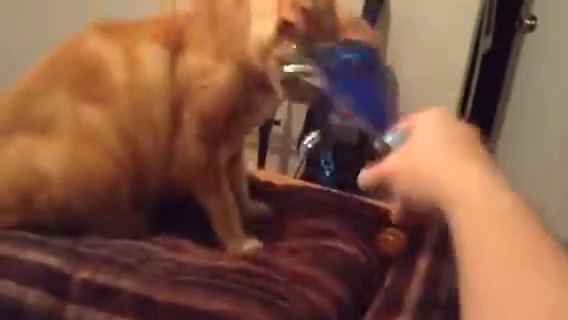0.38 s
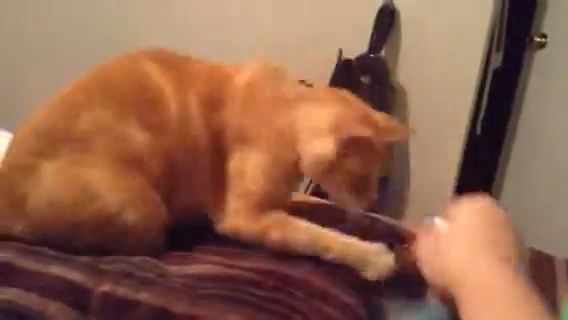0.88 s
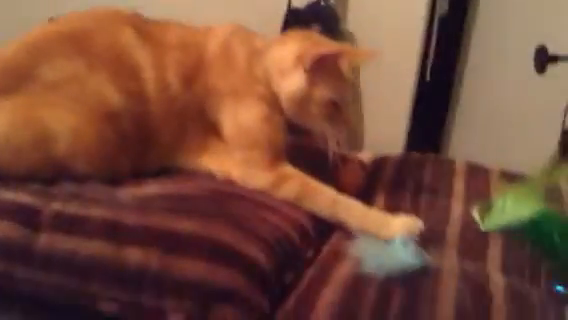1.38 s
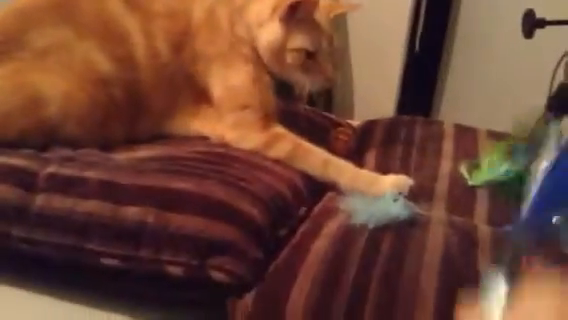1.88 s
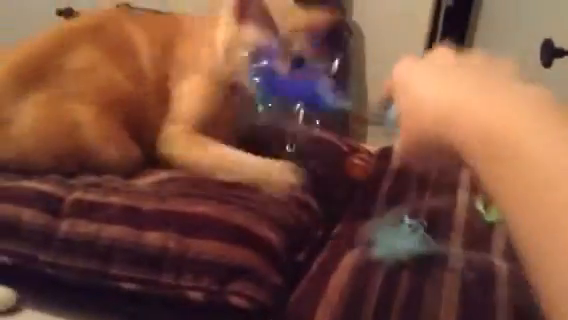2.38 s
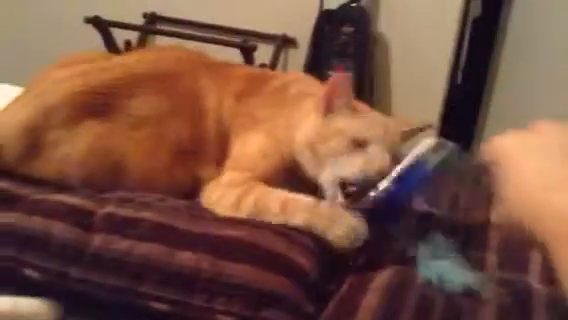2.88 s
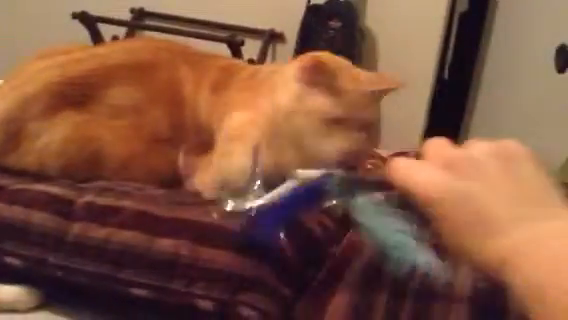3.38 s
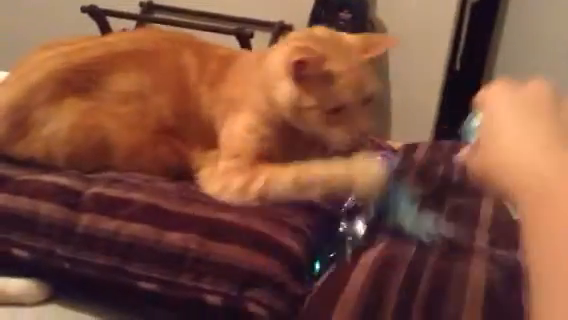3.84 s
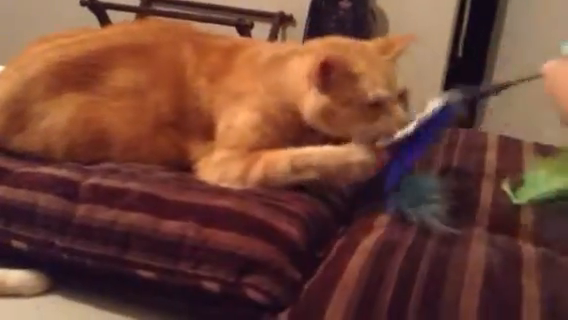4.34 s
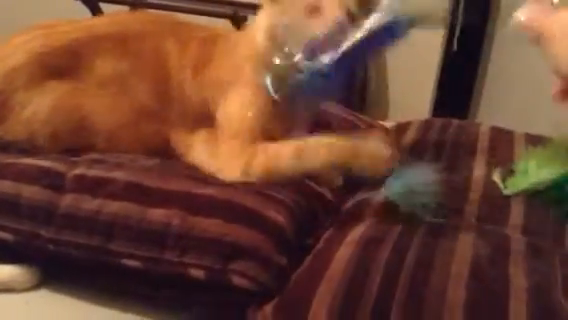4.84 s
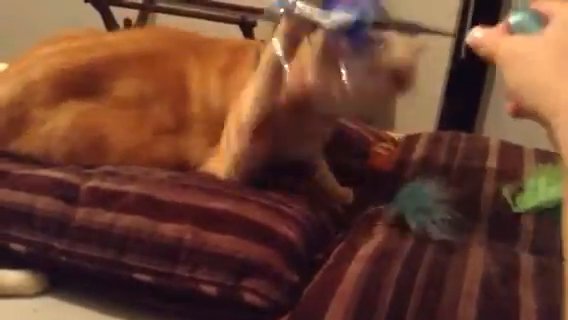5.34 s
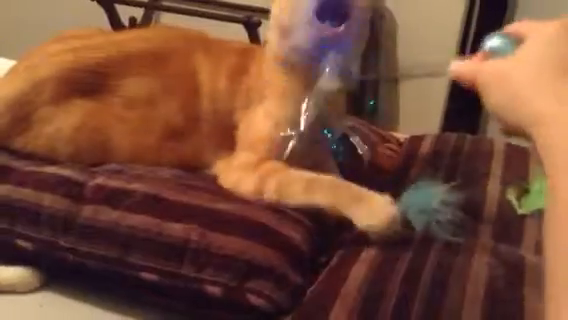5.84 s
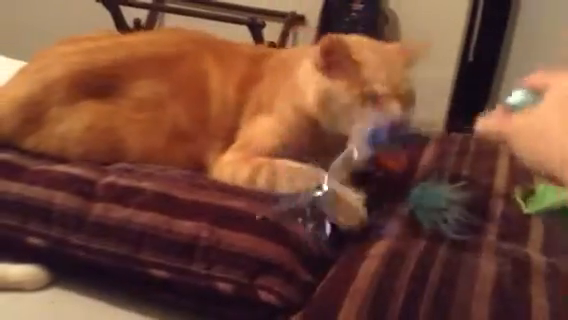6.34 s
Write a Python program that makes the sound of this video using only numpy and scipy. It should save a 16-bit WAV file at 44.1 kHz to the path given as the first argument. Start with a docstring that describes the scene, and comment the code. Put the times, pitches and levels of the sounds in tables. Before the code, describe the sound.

Close to a phone in a small bedroom, thin foil streamers swish and crackle in irregular bursts. Early on, two hard wand knocks land with dry scratching on cloth between and after them; later come a bright snap, another loud knock, then busy crinkling and small ticks. A low fan hum with soft hiss runs steadily underneath.

```python
"""Foil streamers and feathers on a wand toy rustle and snap as a cat on a bed bats them, close to a phone.
Dense noise grains make the rustle and short filtered bursts the snaps; damped resonances make the wand's
knocks and scrapes, and sparse clicks the ticking of a loose part. Paws thump softly on the mattress.
A fan motor hums behind the wall as wavering sines and resonant noise, over the hiss of the microphone.
A small bedroom answers the hits, scrapes and ticks with decaying noise."""
import sys
import numpy as np
from scipy import signal
from scipy.fft import rfft, irfft
from scipy.io import wavfile
from scipy.ndimage import uniform_filter1d

SR = 44100
rng = np.random.default_rng(int(sys.argv[2]) if len(sys.argv) > 2 else 0)


def log_audio(samples):
    """Write samples as a 16-bit WAV file to the path given in sys.argv[1]."""
    # one column per channel
    frames = np.atleast_2d(samples).T
    # limit to full scale, then quantise
    limited = np.clip(frames, -1, 1)
    pcm = np.round(limited * 32767).astype(np.int16)
    wavfile.write(sys.argv[1], SR, pcm)


def ratio_of_db(decibels):
    """Turn decibels (scalar or array-like) into linear amplitude factors; 0 dB maps to 1."""
    return 10 ** (np.asarray(decibels, float) / 20)


N = 285768
T = np.arange(N) / SR

# swings of the streamers: peak_s, level_db, rise_s, fall_s, lower_treble_db (relative to level_db)
STREAMER_SWINGS = [(0.1, -60, 0.38, 0.16, -11), (0.24, -54.5, 0.33, .1, -11), (0.44, -53, 0.27, 0.22, -9.5),
                   (0.6, -51, 0.033, .12, -11), (0.657, -41, 0.025, 0.071, -8), (0.78, -47.5, 0.1, .12, -5),
                   (0.86, -49.5, 0.14, 0.062, -12), (0.965, -51.5, .03, 0.3, -7), (1.12, -58, .1, 0.096, 0),
                   (1.338, -52.5, .06, 0.15, -11), (1.75, -52, 0.15, .2, 2.5),
                   (1.89, -52.5, 0.087, 0.22, -1), (2.19, -46.5, 0.12, .1, -8),
                   (2.28, -47.5, .08, 0.12, -12), (2.37, -46.5, 0.19, 0.091, -7.5),
                   (2.55, -49.5, 0.23, 0.26, -9.5), (2.631, -36, 0.025, 0.095, -10.5),
                   (2.85, -49, 0.23, 0.038, -9), (2.938, -45, 0.082, .1, -8.5),
                   (3.21, -50, 0.065, .12, -14), (3.38, -53, 0.23, .2, -14), (3.48, -47, 0.018, 0.091, -14),
                   (3.525, -43.5, 0.098, 0.13, -5.5), (3.605, -50, 0.027, 0.16, -9),
                   (3.82, -52.5, 0.12, .2, -1.5), (3.97, -47, 0.21, 0.2, -9), (4.17, -63, 0.17, 0.025, -17),
                   (4.265, -45, 0.018, .12, -6), (4.39, -53, 0.022, .06, -8), (4.428, -45, 0.023, 0.027, 2),
                   (4.55, -53, 0.38, 0.17, -11), (4.76, -48, 0.074, 0.088, -13),
                   (4.81, -48, .08, 0.094, -12), (4.96, -49, 0.13, 0.21, -14),
                   (5.125, -46.5, .12, 0.098, -8), (5.18, -42, 0.13, 0.12, -11),
                   (5.4, -50.5, 0.035, .15, -10), (5.525, -44.5, .06, 0.068, -11),
                   (5.59, -47, 0.12, 0.2, -11), (5.803, -52, 0.011, 0.23, -14),
                   (5.99, -53, 0.12, 0.29, -16), (6.17, -53, 0.24, 0.16, -10),
                   (6.25, -48.5, 0.16, 0.24, -22), (6.43, -52, 0.044, 0.072, -6.5)]
# modes the wand rings with: pitch_hz, level_db, t60_s
WAND_MODES = [(339, -13.5, 0.051), (483, -6, 0.12), (740, -15.5, 0.013), (1260, -11.5, 0.02),
              (1655, -1.5, 0.038), (2125, -4.5, 0.027), (2653, 1, 0.012), (2820, -2, 0.0035),
              (3600, -16, 0.0075), (4380, 1, 0.01), (5850, -2.5, 0.0061), (6830, -3.5, 0.0025),
              (8300, -8, 0.0046), (11300, -19, 0.0016)]


def unit(x):
    """Scale to rms 1."""
    return x / np.sqrt(np.mean(x ** 2))


def colour(x, points):
    """Shape a spectrum through (Hz, dB) points, interpolated along log frequency."""
    hz, db = np.transpose(points)
    f = np.fft.rfftfreq(len(x), 1 / SR) + 1
    return irfft(rfft(x) * ratio_of_db(np.interp(np.log(f), np.log(hz), db)), len(x))


def band(x, hz, width):
    """Resonance with gain 1 at its centre; width in Hz."""
    return signal.lfilter(*signal.iirpeak(hz, hz / width, fs=SR), x)


def walk(rate):
    """Random levels held 1 / rate s and slewed twice; spread near 1."""
    hold = int(SR / rate)
    steps = rng.standard_normal(1000)[np.arange(N) // hold]
    return 1.3 * uniform_filter1d(uniform_filter1d(steps, hold), hold)


def grains(per_s, spread_db):
    """Clicks at random moments; most are small, a few stand out, none by much."""
    struck = rng.random(N) < per_s / SR
    size = np.minimum(rng.exponential(size=N), 4.5)
    sign = np.sign(rng.standard_normal(N))
    return unit(struck * ratio_of_db(spread_db * size) * sign)


def strokes(rows, db):
    """Envelope of strokes that each swell to a peak and die away; their powers add."""
    span_db, roundness = 20, 1.14  # drop after one rise or fall time; 1 = pointed peak, 2 = bell
    peak_s, rise_s, fall_s = (np.array(rows)[:, k:k + 1] for k in (0, 2, 3))
    coarse = T[::64]
    t = coarse - peak_s
    away = np.where(t < 0, -t / rise_s, t / fall_s)
    each = ratio_of_db(np.asarray(db)[:, None] - span_db * away ** roundness)
    return np.interp(T, coarse, np.sqrt(np.sum(each ** 2, axis=0)))


def burst(noise, ms):
    """A ragged contact as heard directly, and the one click of equal energy that the walls blur it into."""
    ragged = noise * np.exp(-T[:len(noise)] / (ms / 1000))
    ragged[0] = 3  # the first touch is hard
    click = signal.unit_impulse(len(noise)) * np.sqrt(np.sum(ragged ** 2))
    return np.array([ragged, click])


def add(out, s, sound, db):
    """Place a short sound and any echo feed; db stands for three times the rms of its loudest 3 ms."""
    i = int(s * SR)
    piece = sound[:, :N - i]
    peak = 3 * np.sqrt(np.max(uniform_filter1d(sound[0] ** 2, size=132)))
    out[:, i:i + piece.shape[1]] += ratio_of_db(db) * piece / peak


def streamers():
    """Thousands of tiny foil crackles a second; broad strokes against fur bring in the lower treble."""
    # tone of the foil: pitch_hz, level_db (per Hz, relative)
    foil = [(880, -26), (1500, -15.5), (1710, -15.5), (2140, -15), (3920, -11.5), (4730, -11),
            (14500, -3.5), (15500, -11.5), (16000, -30)]
    _, db, _, _, lower_db = np.transpose(STREAMER_SWINGS)
    crackle = colour(grains(per_s=6000, spread_db=2.0), foil)
    low = signal.lfilter(*signal.butter(3, 6000, fs=SR), crackle)
    upper_rustle = strokes(STREAMER_SWINGS, db) * unit(crackle - low)
    lower_rustle = strokes(STREAMER_SWINGS, db + lower_db) * unit(low)
    flicker_db = 1.2 * walk(70)
    return (upper_rustle + lower_rustle) * ratio_of_db(flicker_db)


def fan():
    """Motor tones that waver a little, air noise in the housing, and the even hiss."""
    # hum of the motor: pitch_hz, level_db (rms)
    motor = [(70.0, -74.5), (118.4, -73), (140.0, -60.5), (199.2, -53)]
    # resonances of the fan housing: pitch_hz, width_hz (of the narrower of two filters), level_db (rms)
    housing = [(135.7, 4.6, -79), (205.95, 17, -56), (205.8, 25.5, -56.5), (232, 2.7, -63),
               (835, 8.8, -71.5), (1853, 57, -74.5)]
    # background air and hiss: pitch_hz, level_db (per Hz)
    air = [(30, -104), (85, -107), (120, -86), (170, -76.5), (260, -78.5), (400, -83.5), (630, -86),
           (800, -92.5), (950, -95), (2000, -98.5), (2800, -103), (5000, -104), (9000, -103), (15000, -101)]
    out = np.sqrt(SR / 2) * colour(rng.standard_normal(N), air)
    for hz, db in motor:
        level = ratio_of_db(db + 0.59 * walk(5.35))
        cycles = hz * T + 0.15 * walk(3.87) + rng.random()
        out += level * np.sqrt(2) * np.sin(2 * np.pi * cycles)
    for hz, width, db in housing:
        rush = band(band(rng.standard_normal(N), hz, width), hz, 2 * width)
        out += ratio_of_db(db) * unit(rush)
    return out


def crinkles():
    """Small extra snaps at random moments and pitches, louder where the streamers are busy."""
    per_s, above_db, low_hz, high_hz = 25, 12, 3350, 10900  # above_db: highest level over the rustle
    when, size, pitch = rng.random((int(per_s * N / SR), 3)).T
    swing_level = strokes(STREAMER_SWINGS, np.transpose(STREAMER_SWINGS)[1])
    busy = swing_level[(when * (N - 1)).astype(int)]
    db = 20 * np.log10(busy) + above_db - 8 * size
    hz = low_hz * (high_hz / low_hz) ** pitch
    return [(w * N / SR, d, f, 0.6) for w, d, f in zip(when, db, hz)]


def snaps():
    """Each snapping foil crease gives a burst of about a millisecond's decay around its own pitch."""
    # foil creases: start_s, peak_db, pitch_hz, spread (half of it, up to 1, times the pitch is the width)
    creases = [(0.6477, -35, 10500, 1.6), (0.776, -31, 11600, 2.3), (1.3396, -34.5, 8790, 0.99),
               (2.4325, -34.5, 6100, 1.1), (2.6155, -29, 7410, 1.8), (2.6229, -13.5, 4460, 0.16),
               (2.8551, -26, 12700, .89), (2.9323, -28.5, 4280, 0.59), (3.069, -28, 11300, 1.2),
               (3.0888, -23, 10700, 0.31), (3.1687, -30, 6990, 2.2), (3.1874, -28.5, 3540, 0.7),
               (3.2184, -29, 9640, 1.7), (3.4714, -29, 9140, 1.7), (3.5233, -25, 8400, 0.31),
               (3.5987, -24.5, 10400, 1.7), (3.7414, -37, 9950, 1.7), (3.8, -35, 7200, 1.4),
               (3.85, -34.5, 5520, 1.2), (3.91, -34, 10200, 2.7), (3.923, -29, 5000, 1.4),
               (3.9416, -28.5, 6000, 1), (3.9789, -28.5, 9200, 2.6), (4.0656, -41, 4970, 1.4),
               (4.129, -39, 8800, 0.65), (4.1414, -42, 8500, .9), (4.1753, -35, 9100, 0.47),
               (4.2492, -35, 8190, 1.4), (4.265, -28.5, 4270, 0.37), (4.3859, -35, 9730, 1.4),
               (4.399, -32.5, 12100, 1.4), (4.4251, -25, 8100, 2.4), (4.7534, -32, 10900, 1.4),
               (4.8663, -36, 6910, 1.1), (4.9192, -36.5, 6600, 1), (5.084, -35, 5000, 2),
               (5.3814, -30, 10700, 1.2), (5.4123, -24.5, 6750, 0.27), (5.441, -34, 7140, 1.4),
               (5.471, -34, 6430, 1.2), (5.7984, -24, 7610, 1.6), (6.429, -39, 11500, 1.4)]
    out = np.zeros((2, N))
    no_bass = signal.butter(2, 2800, "high", fs=SR)  # thin foil radiates no bass
    for s, db, hz, spread in creases + crinkles():
        crease = signal.lfilter(*no_bass, burst(rng.standard_normal(1024), ms=0.98))
        pitched = band(crease, hz, hz * min(spread, 2) / 2)
        wide = band(crease, 7600, 6500)
        add(out, s, pitched + ratio_of_db(-6) * wide, db)
    return out


def rattle():
    """A loose part ticks while the wand is shaken: sparse clicks into one short mode."""
    # shakes: peak_s, level_db, rise_s, fall_s
    shakes = [(0.75, -73, 0.2, .3), (2.3, -67, .3, .3), (2.5, -65, .3, .3), (4.3, -72, 1.2, .3),
              (4.85, -69.5, .3, .7), (5.1, -67, .5, .4), (6.1, -76, 1.5, 1.4)]
    ticks = grains(per_s=110, spread_db=3.5)
    ticks = band(band(ticks, 3800, 300), 3800, 800)
    return unit(ticks) * strokes(shakes, np.transpose(shakes)[1])


def ring(pushes, bright_db):
    """The wand's modes, each excited by its own force; the tilt in dB per octave turns about 2500 Hz."""
    out = 0
    for push, (hz, db, t60) in zip(pushes, WAND_MODES):
        width = np.log(1000) / (np.pi * t60)
        out = out + ratio_of_db(db + bright_db * np.log2(hz / 2500)) * band(push, hz, width)
    return out


def knocks():
    """Clicks of contact ring the wand; the struck surface adds a dull slap and a bright crack."""
    # wand on something hard: start_s, peak_db, slap_hz, brightness_db (per octave), low_db (under 1450 Hz)
    hits = [(1.0261, -10, 2780, -4, -1), (1.171, -44, 1800, -5, 3), (1.5215, -48, 3600, -7, -25),
            (1.5606, -7.5, 4500, -0.5, 8), (1.645, -35, 1260, -4, 4), (1.7062, -40, 1690, -7, -9),
            (1.785, -35, 740, -2, 25), (1.8072, -32, 2500, -5.5, 3), (1.8634, -22.5, 2820, -3.5, 1),
            (1.908, -42, 1680, 1, -9), (1.927, -40, 2800, -11, -17), (2.011, -39.5, 1700, 5, 17),
            (2.612, -34.5, 790, -6.5, 6), (3.0039, -8.5, 2730, -4.5, -13.5), (5.67, -47, 2400, -7, -16),
            (5.8706, -41, 3900, 4, -12), (6.1251, -42, 2200, -6.5, 3), (6.2497, -30.5, 2200, 3.5, 11.5),
            (6.388, -48, 3700, -3, -12)]
    contact_ms = 2.2
    out = np.zeros((2, N))
    upper = signal.butter(4, 1450, "high", fs=SR, output="sos")
    lower = signal.butter(5, 1450, fs=SR)
    for s, db, slap_hz, bright_db, low_db in hits:
        push = burst(rng.standard_normal(8192), contact_ms)
        slap = band(band(push, slap_hz, 0.5 * slap_hz), slap_hz, 1.3 * slap_hz)
        crack = ratio_of_db(1.4 * bright_db) * band(band(push, 9700, 7700), 12400, 9300)
        # each mode is caught at its own instant of the contact
        lags = rng.random(len(WAND_MODES)) * contact_ms * SR / 1000
        touches = [np.roll(push[1], int(lag)) for lag in lags]
        sound = ring(touches, bright_db) + ratio_of_db(-4) * slap + ratio_of_db(-6.5) * crack
        # the walls hear the wand from every side, which fills the gaps between its modes
        blurred = np.sqrt(uniform_filter1d(np.abs(rfft(sound[1])) ** 2, size=45))
        sound[1] = np.roll(irfft(blurred), 128)
        # a blow near the thin end leaves the low modes asleep
        high = signal.sosfilt(upper, sound)
        low = signal.lfilter(*lower, sound)
        add(out, s, ratio_of_db(low_db) * low + high, db)
    return out


def scrape():
    """Stick-slip against cloth: each slip catches one mode or another, over a finer scratching."""
    # wand dragged over the cover: peak_s, level_db, rise_s, fall_s
    drags = [(1.09, -43.5, 0.058, 0.074), (1.18, -52, 0.05, .15), (1.338, -45, 0.027, 0.027),
             (1.7, -50, 0.13, .2), (1.8, -49, 0.14, 0.09), (1.9, -46.5, 0.034, 0.091),
             (2.01, -57, 0.12, 0.03), (6.14, -61, .06, 0.14), (6.25, -63, .1, 0.23)]
    slips = grains(per_s=76, spread_db=6.0)
    # shifted copies of the slips keep the modes from sounding together
    shifted = [np.roll(slips, 7919 * k) for k in range(len(WAND_MODES))]
    scraps = ring(shifted, bright_db=-3.5)
    scratch = band(grains(per_s=800, spread_db=2.5), 1900, 3100)
    return strokes(drags, np.transpose(drags)[1]) * unit(unit(scraps) + unit(scratch))


def thumps():
    """Paws landing on the mattress: soft, heavily damped pushes."""
    # landings: start_s, level_db (three times the loudest 3 ms rms), pitch_hz
    landings = [(2.329, -38, 165), (2.612, -54, 70)]
    out, t = np.zeros((1, N)), T[None, :8192]
    for s, db, hz in landings:
        add(out, s, t * np.exp(-t * hz / 1.4) * np.sin(2 * np.pi * hz * t), db)
    return out[0]


def room(x):
    """Dense small-room tail, longest in the lows; its echoes change each half second as the toy moves."""
    # decay of the room: pitch_hz, t60_s
    decay_times = [(500, 0.32), (2000, 0.12), (6000, 0.15), (14000, 0.19)]
    level_db, build_up_s = -1.5, 0.00043
    step = SR // 2
    t = T[:step]
    hz, t60 = np.transpose(decay_times)
    tails, out = 0, np.zeros(N + SR)
    for f in 350 * 2 ** np.arange(0, 5.6, 0.5):
        decay = np.exp(-np.log(1000) * t / np.interp(np.log(f), np.log(hz), t60))
        noise = rng.standard_normal((N // step + 1, len(t)))
        tails = tails + band(noise, f, f / 3) * decay
    tails = tails * (1 - np.exp(-t / build_up_s))
    for k, echoes in enumerate(tails):
        echoes = echoes / np.sqrt(np.sum(echoes ** 2))
        wet = signal.fftconvolve(x[k * step:(k + 1) * step], echoes)
        out[k * step:k * step + len(wet)] += wet
    return ratio_of_db(level_db) * out[:N]


def scene():
    """The toy close by over the fan; hits, scrapes and ticks wake the room."""
    direct, click = snaps() + knocks()
    drag, ticks = scrape(), rattle()
    echoes = room(click + ratio_of_db(-9) * ticks + ratio_of_db(-4.5) * drag)
    toy = streamers() + direct + drag + ticks
    return (toy + echoes + thumps() + fan())[None]


def roll_off(x):
    """The treble ends steeply here."""
    return signal.sosfilt(signal.butter(12, 16460, fs=SR, output="sos"), x)


def record(dry):
    """The phone cuts the top steeply above 15400 Hz."""
    top_cut = signal.ellip(10, 0.2, 50, 15400, fs=SR, output="sos")
    mix = signal.sosfilt(top_cut, dry)
    return roll_off(mix)


dry = scene()
out = record(dry)
log_audio(out)
```